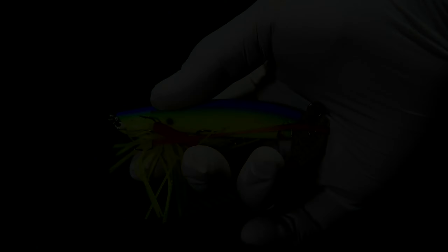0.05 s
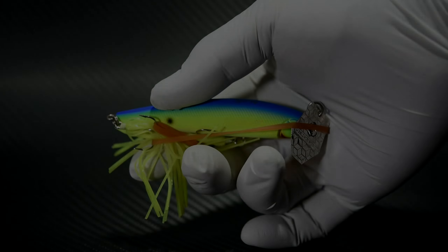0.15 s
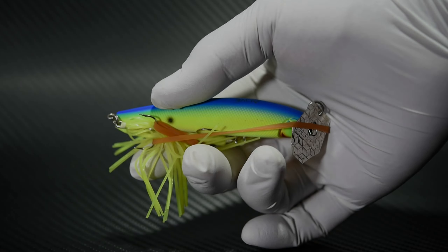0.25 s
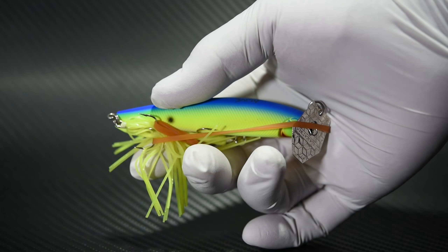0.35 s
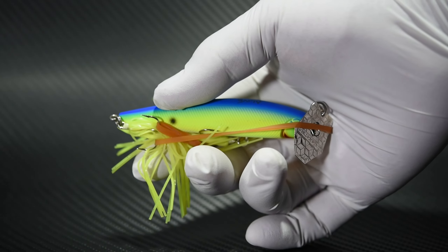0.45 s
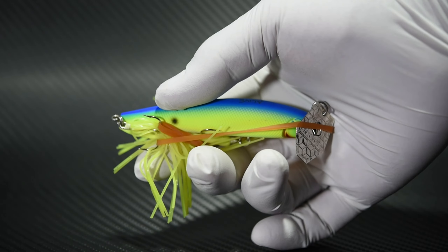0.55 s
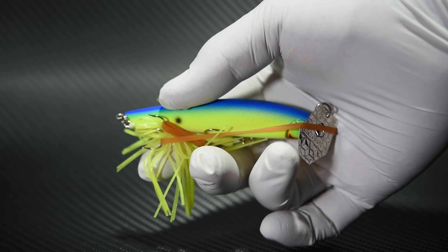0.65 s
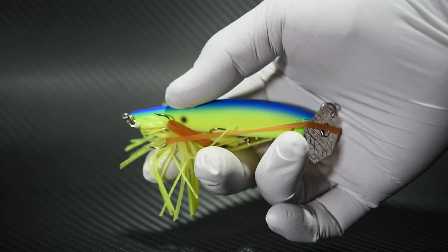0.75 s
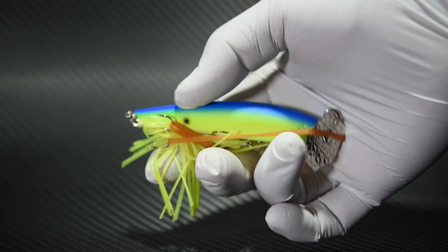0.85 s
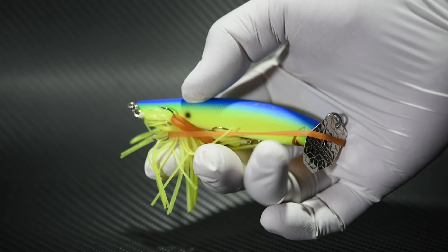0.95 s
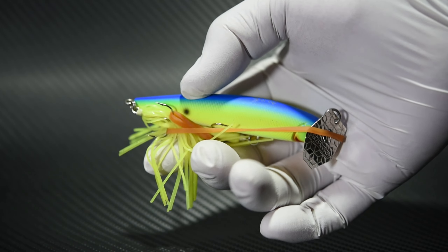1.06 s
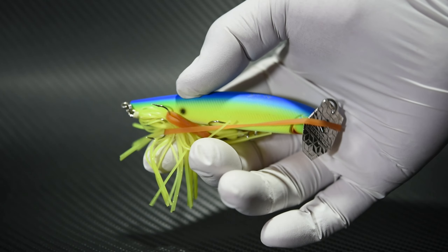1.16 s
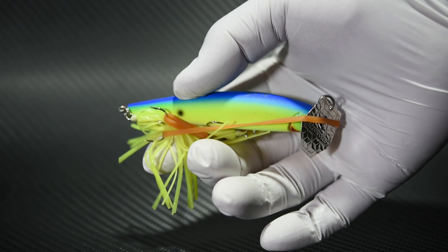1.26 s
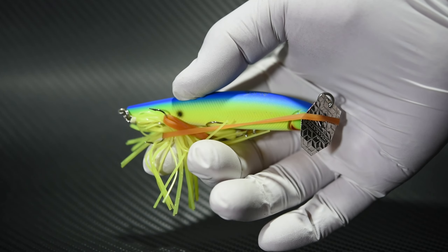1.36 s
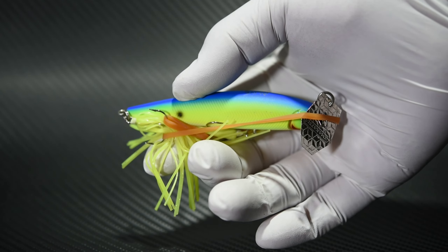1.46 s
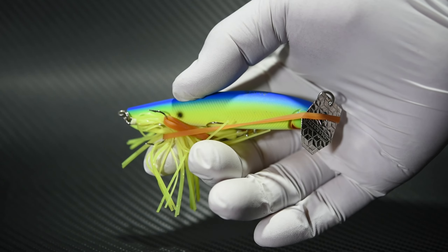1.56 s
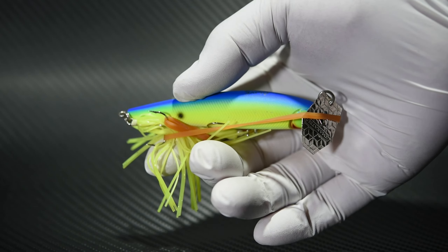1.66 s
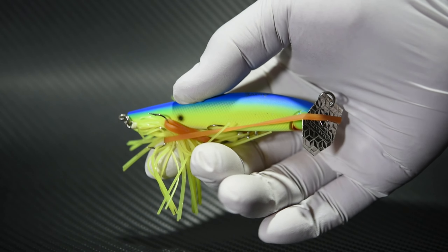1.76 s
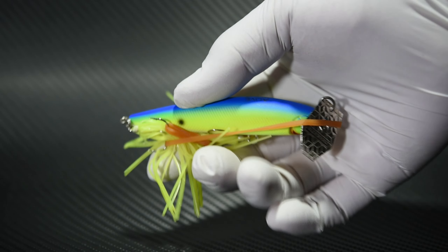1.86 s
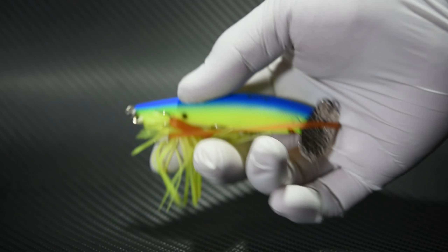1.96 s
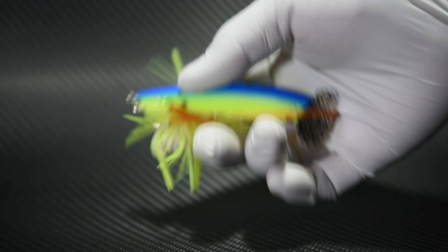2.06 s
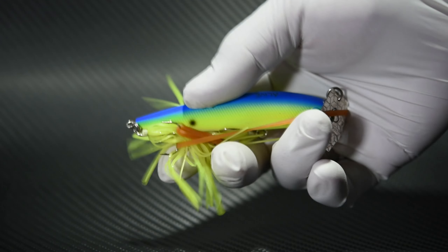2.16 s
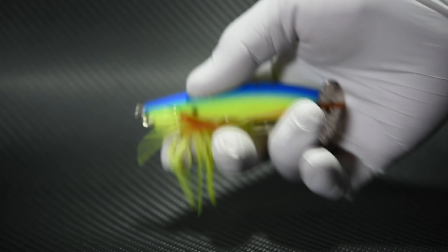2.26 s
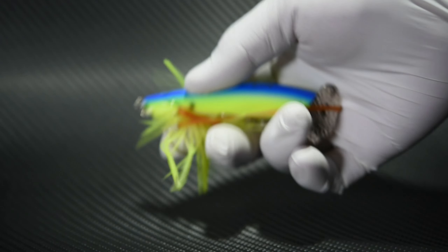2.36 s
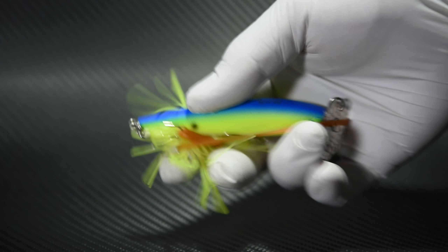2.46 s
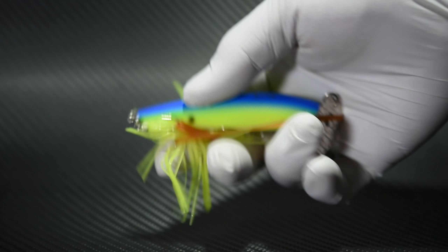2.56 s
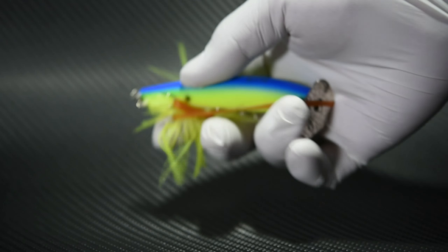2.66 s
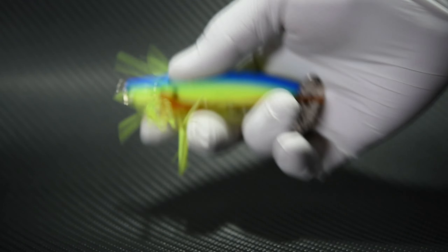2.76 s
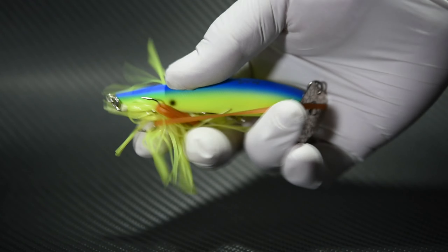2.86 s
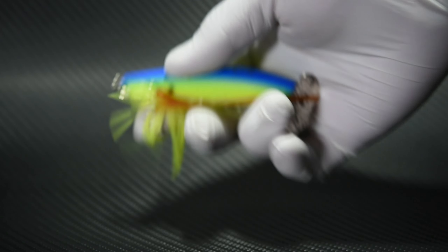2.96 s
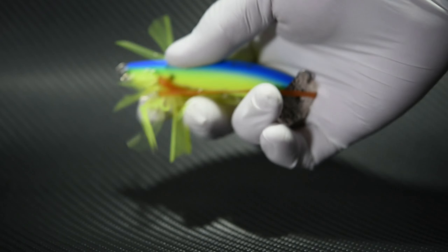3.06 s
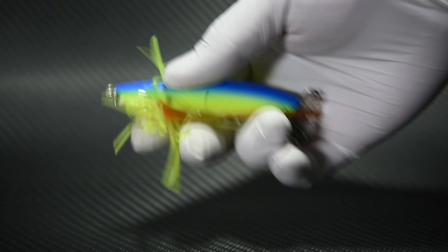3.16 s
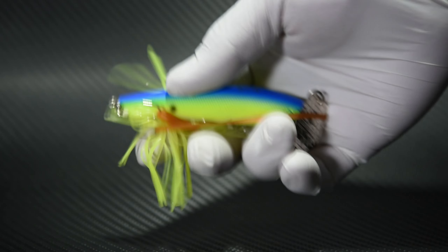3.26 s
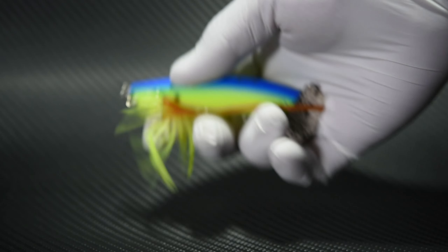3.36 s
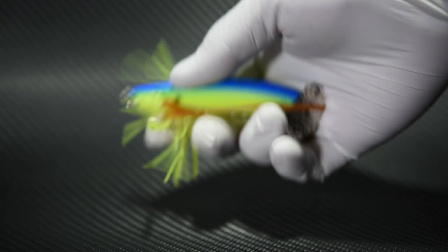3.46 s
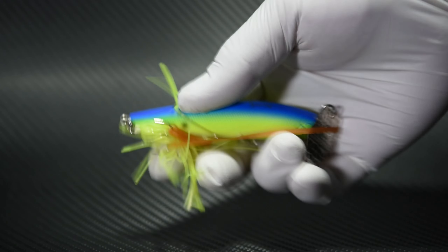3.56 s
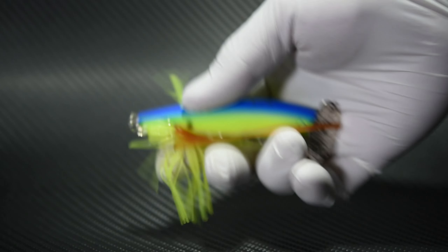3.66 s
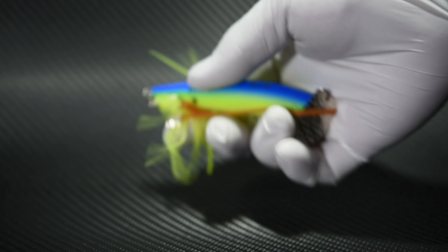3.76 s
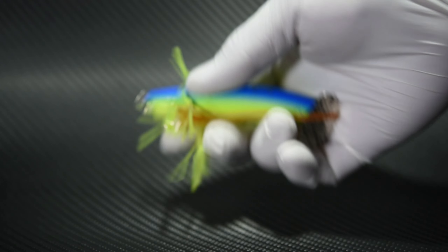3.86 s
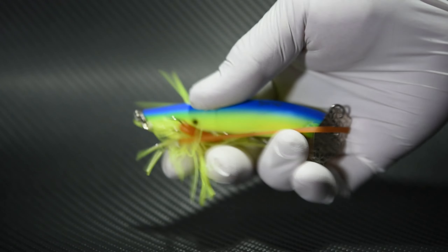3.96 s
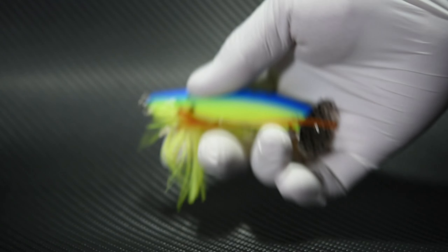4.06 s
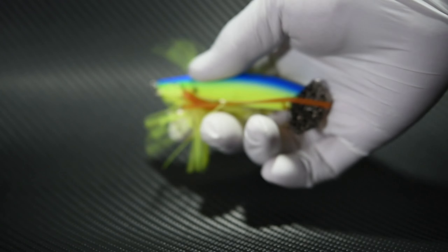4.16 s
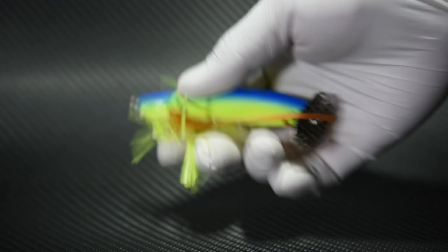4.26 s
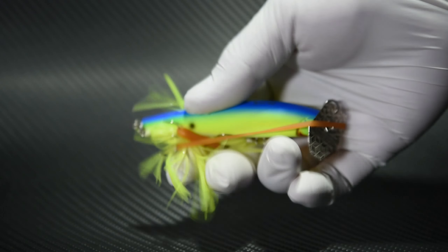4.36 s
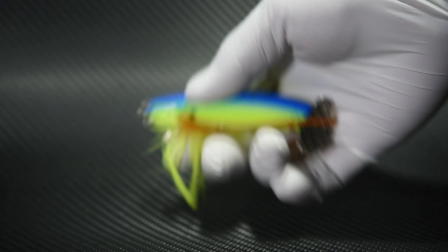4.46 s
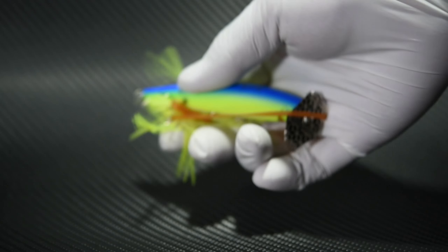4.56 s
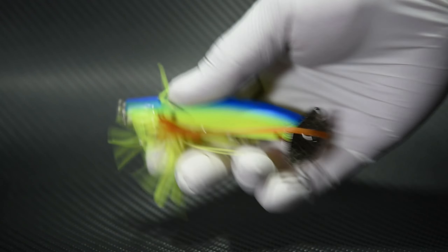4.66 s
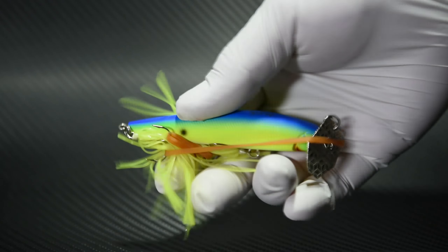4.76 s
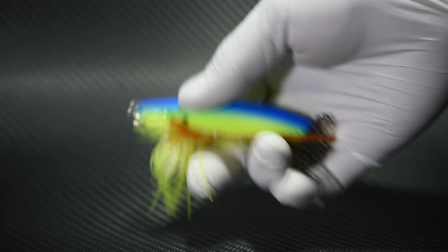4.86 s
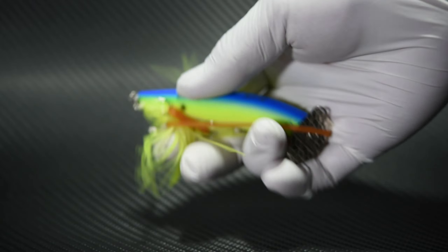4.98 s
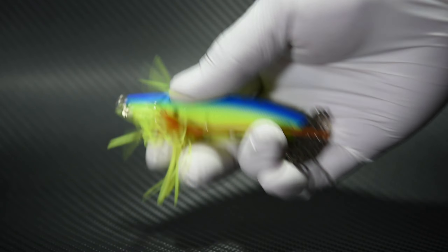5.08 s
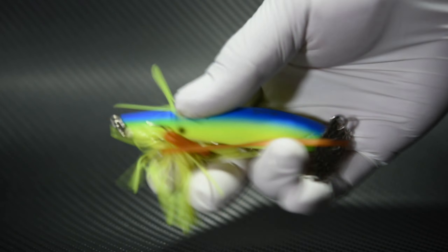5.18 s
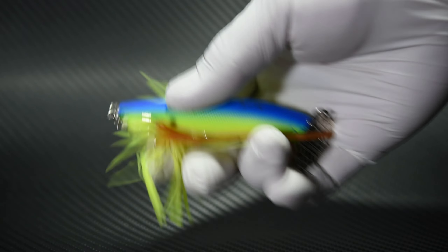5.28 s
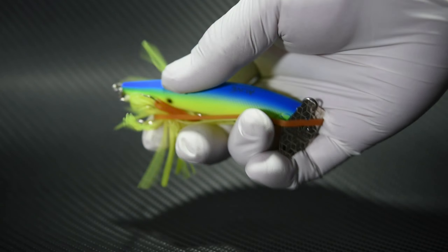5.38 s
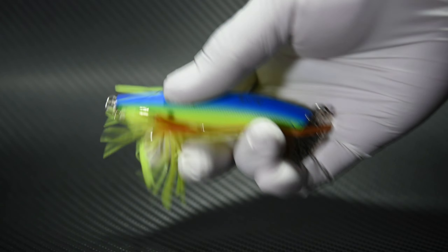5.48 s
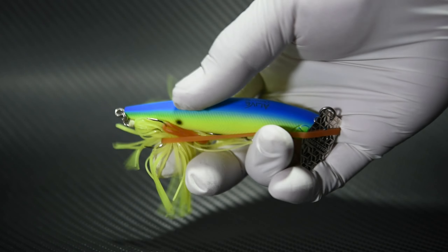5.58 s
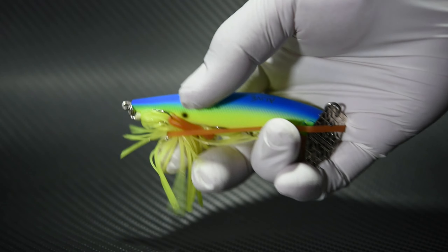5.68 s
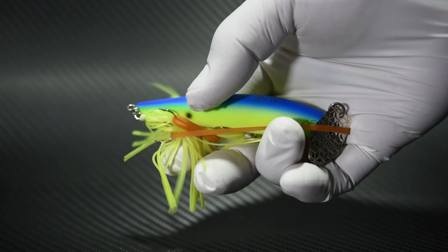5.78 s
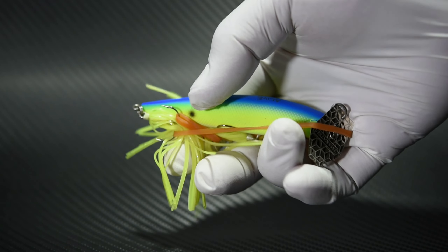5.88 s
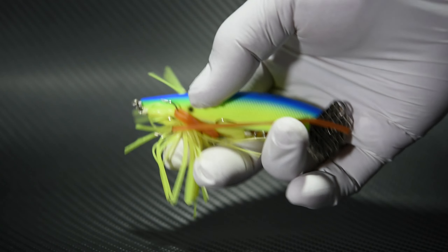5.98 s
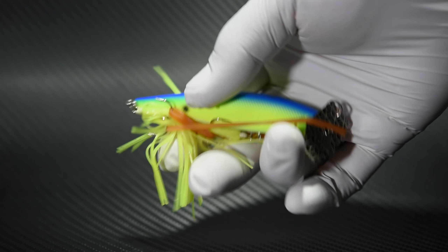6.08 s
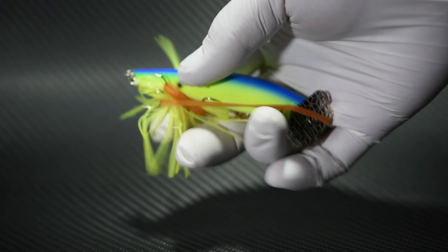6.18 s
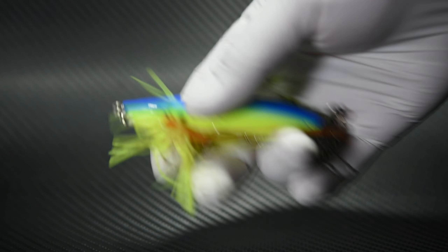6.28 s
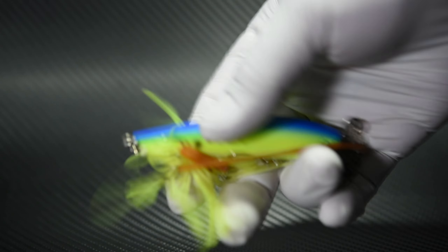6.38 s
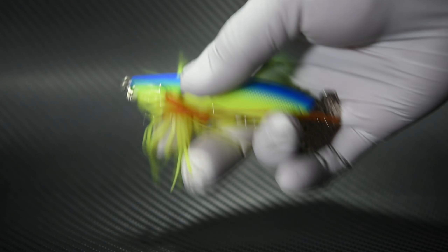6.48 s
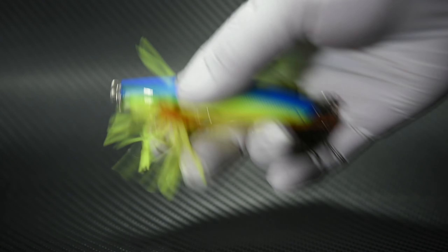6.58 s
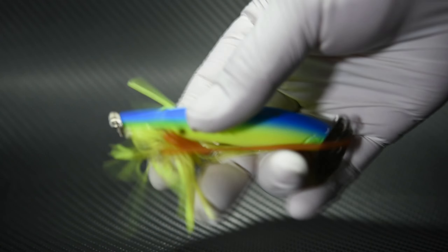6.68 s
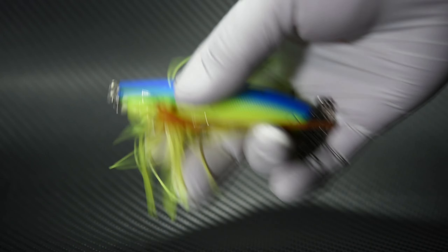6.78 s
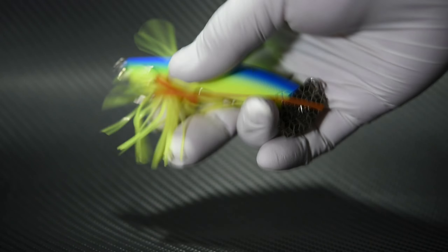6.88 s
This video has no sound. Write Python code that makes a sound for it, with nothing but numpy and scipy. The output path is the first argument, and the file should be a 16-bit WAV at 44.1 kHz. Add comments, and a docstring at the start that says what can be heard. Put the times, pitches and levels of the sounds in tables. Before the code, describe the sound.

Sound fades in quickly from silence to a faint mains hum and airy fan, with light glove rubs. A rapid, even rattle follows: hard balls slamming back and forth inside a thin plastic shell, some fourteen crisp knocks a second, each with a short scatter of bounces. It runs over three seconds, pauses about half a second, and starts again. Close microphone, short small-room echo.

```python
"""Shaken fishing lure

A gloved hand shakes a hollow plastic lure about seven times a second, in two bouts.
At each turn loose balls slam into one end of the shell, bounce and jostle: ringing knocks, echoed by
a small room. Before and between the bouts the glove rubs faintly: crackling noise bands.
A fan runs throughout: sines for mains hum, filtered noise for its tones and air."""
import sys
import numpy as np
from scipy import signal
from scipy.fft import rfft, irfft, next_fast_len
from scipy.io import wavfile

SR = 44100
rng = np.random.default_rng(int(sys.argv[2]) if len(sys.argv) > 2 else 0)


def materialize(psi):
    """Save the field psi as 16-bit PCM at rate SR to the path in sys.argv[1].

    A 1-D psi becomes a single channel; in a 2-D psi each row is a channel.
    """
    bounded = np.clip(np.atleast_2d(psi).T, -1, 1)
    quanta = np.round(bounded * 32767).astype(np.int16)
    wavfile.write(sys.argv[1], SR, quanta)


N = 305613
TIME = np.arange(N) / SR
FFT_SIZE = next_fast_len(N, True)
KNOCK_SAMPLES, LEAD_SAMPLES = 512, 8  # knock length; silence before its attack


def undb(db):
    """Decibels to gain."""
    return 10 ** (np.asarray(db) / 20)


def unit(x):
    """Scale to rms 1."""
    return x / np.sqrt(np.mean(x ** 2))


def along(hz, points_hz, values):
    """Join points by straight lines on a log-frequency axis."""
    return np.interp(np.log(hz + 1), np.log(points_hz), values)


def bell(hz, centre_hz, width_hz):
    """Power response of one resonance, 1 at its centre."""
    return 1 / (1 + (2 * (hz - centre_hz) / width_hz) ** 2)


def noise(gain):
    """White noise through a frequency response."""
    spectrum = rfft(rng.standard_normal(N), FFT_SIZE)
    return irfft(spectrum * gain, FFT_SIZE)[:N]


def add(out, at_s, sound):
    """Mix a stereo sound in at a time."""
    start = max(int(round(at_s * SR)), 0)
    length = max(min(sound.shape[1], N - start), 0)
    out[:, start:start + length] += sound[:, :length]


def uneven(spread_db, count):
    """Random strengths, normally distributed in dB."""
    return undb(spread_db * rng.standard_normal(count))


def curve(table, at_s):
    """Value of each column at a time, on straight lines between rows."""
    times_s, *columns = np.transpose(table)
    return [np.interp(at_s, times_s, column) for column in columns]


def fan(waver=0.032):
    """Mains hum of slightly swaying sines, plus noise shaped into wavering tones and air, left and right."""
    # mains hum: (frequency [Hz], level [dB rms])
    hum_lines = [(120, -53.5), (180, -61), (240, -53), (300, -61), (360, -64.5), (420, -67), (480, -71.5)]
    # wavering tones, level common to both sides: (frequency [Hz], width [Hz], level [dB rms])
    tones = [(225, 33, -60.5), (267.7, 6.7, -58), (768, 32, -68.5), (959, 19, -71.5), (1151, 38, -66.5),
             (1360, 14, -68.5), (1508, 12, -68), (1677, 21, -70)]
    # air and hiss common to both sides: (frequency [Hz], density [dB per Hz], left-right likeness [-])
    air = [(25, -90, 0.64), (100, -85.5, 0.81), (146, -83, 0.87), (218, -74, 0.98), (300, -80, 0.9),
           (383, -80.5, 0.43), (500, -86.5, 0.58), (760, -89, 0.72), (1095, -84.5, 0.46),
           (1490, -86.5, 0.53), (1900, -90, 0), (3200, -89, 0.0004), (9050, -90.5, 0), (10700, -97.5, 0),
           (14200, -108, 0)]
    hum = 0
    for line_hz, db in hum_lines:
        sway_points = rng.standard_normal(size=30)
        sway = 1 + waver * np.interp(TIME, np.linspace(0, TIME[-1], num=30), sway_points)
        sine = np.sin(2 * np.pi * (line_hz * TIME + rng.random()))
        hum = hum + np.sqrt(2) * undb(db) * sway * sine

    hz = np.fft.rfftfreq(FFT_SIZE, 1 / SR)
    points_hz, air_db, likeness = np.transpose(air)
    power_per_hz = undb(along(hz, points_hz, air_db)) ** 2
    for tone_hz, width_hz, db in tones:
        # the squared bell has area width * pi / 4
        power_per_hz = power_per_hz + undb(db) ** 2 * bell(hz, tone_hz, width_hz) ** 2 / (width_hz * np.pi / 4)
    gain = np.sqrt(power_per_hz * SR / 2)
    alike = np.clip(along(hz, points_hz, likeness), -.5, 1)
    common = noise(gain)
    difference = noise(gain * np.sqrt((1 - alike) / (1 + alike)))
    return hum + common + np.array([[1], [-1]]) * difference


def glove(rub_db=4.5, crackle_db=6.0):
    """Rubber slips in tiny uneven steps, each rub in its own band."""
    # rubs and nudges; width before its 1.2 factor, level before rub_db:
    # (middle [s], length [s], frequency [Hz], width [Hz], level [dB])
    rubs = [(0.455, 0.063, 3100, 500, -56), (0.5, .25, 11500, 3000, -64), (.58, 0.11, 3200, 400, -57),
            (0.796, 0.089, 9000, 4000, -56), (.97, .24, 12800, 3000, -66), (1.275, 0.056, 5500, 4000, -54),
            (1.404, .06, 7000, 3000, -57), (1.725, .06, 10400, 1400, -59), (1.87, .45, 880, 550, -56.5),
            (1.909, 0.063, 4680, 696, -52), (2.998, .1, 1600, 300, -55.5), (3.06, 0.057, 253, 60, -49),
            (5.728, 0.024, 3100, 500, -54), (5.958, .15, 9350, 3200, -50), (6.06, 0.012, 4800, 2000, -46),
            (6.136, 0.016, 6960, 3500, -42)]
    out = np.zeros((2, N))
    for middle_s, length_s, centre_hz, width_hz, db in rubs:
        count = int(length_s * SR)
        hz = np.fft.rfftfreq(count, 1 / SR)
        steps = rng.standard_normal((2, count))
        steps = steps * undb(crackle_db * np.minimum(rng.exponential(size=count), 6))
        rub = irfft(rfft(steps) * bell(hz, centre_hz, 1.2 * width_hz), count)
        add(out, middle_s - length_s / 2, unit(rub) * np.hanning(count) * undb(db + rub_db))
    return out


def room(x, early_db=-11.5, early_decay_s=0.0043, tail_db=-10.5, t60_s=0.44, right_db=2.0, count=50):
    """Direct sound, dense early echoes, then a short diffuse tail."""
    # colour of the echo: (frequency [Hz], gain [dB])
    echo_colour = [(2500, 1), (4000, 3), (8000, -4.5), (10500, 0.5), (15000, -5)]
    t = TIME[:SR // 2]
    direct = np.zeros((2, len(t)))
    direct[:, 0] = undb(np.array([-right_db, right_db]) / 2)
    colour = undb(along(np.fft.rfftfreq(len(t), 1 / SR), *np.transpose(echo_colour)))
    early_decay = (t > .0024) * np.exp(-t / early_decay_s)
    tail_decay = (t > .006) * undb(-60 * t / t60_s)
    out = np.zeros((2, N))
    # the lure keeps moving, so each stretch of its sound meets a new pattern of echoes
    for part in np.array_split(np.arange(N), count):
        early, tail = rng.standard_normal((2, 2, len(t)))
        echo = undb(early_db) * unit(early * early_decay) + undb(tail_db) * unit(tail * tail_decay)
        echo = irfft(rfft(echo / np.sqrt(len(t))) * colour, len(t))
        add(out, TIME[part[0]], signal.fftconvolve(x[:, part], direct + echo, axes=1))
    return out


def causal(gain):
    """Minimum-phase impulse response: starts at once, then rings out."""
    cepstrum = irfft(np.log(gain))
    cepstrum[..., 1:KNOCK_SAMPLES // 2] *= 2
    cepstrum[..., KNOCK_SAMPLES // 2 + 1:] = 0
    return irfft(np.exp(rfft(cepstrum)))


def knocks(count, end, cavity_db, bright_db, pitch=1, spot_db=1.5, side_db=3.0, pan_db=1.0, detune=0.025,
           dense_db=-2.5, dense_decay_s=0.00064, lag_spread_s=.00001):
    """Balls strike the nose (end 0) or tail (end 1), exciting the shell's modes: count x 2 x samples."""
    # crack of a hard ball on plastic: (frequency [Hz], nose level [dB], tail level [dB])
    crack_table = [(300, -43, -56), (1190, -27, -39), (1830, -25, -25), (2160, -19, -11),
                   (3470, -12.5, -8.5), (5130, -3.5, -0.5), (7660, 1.5, 2), (9200, -2.5, -4),
                   (10400, -9, -6.5), (12700, -18.5, -12), (15000, -20.5, -17), (16300, -38, -35)]
    # mean ring of the lure, air cavity first, its frequency before the pitch factor:
    # (frequency [Hz], width [Hz], level struck at nose [dB], level struck at tail [dB])
    shell_modes = [(2557, 465, 12, 14), (3430, 190, -2.5, 2), (4720, 370, 1, -2), (5565, 510, 1.5, 8),
                   (7180, 270, 2.5, 3), (8285, 370, 6, 10.5), (9330, 470, 4.5, 9), (11230, 540, 7.5, 9.5),
                   (13650, 760, 5, 4.5)]
    hz, t = np.fft.rfftfreq(KNOCK_SAMPLES, 1 / SR), TIME[:KNOCK_SAMPLES]
    crack, modes = np.transpose(crack_table), np.transpose(shell_modes)
    crack_db = along(hz, crack[0], crack[1 + end])
    crack_db = crack_db + bright_db * along(hz, [4800, 8500], [-.5, .5])
    # the fingers damp the cavity more or less as the grip changes
    crack_db = crack_db + cavity_db * bell(hz, 2740, 1320)

    # each spot weights the modes anew, unevenly for the two sides
    spot = rng.standard_normal((count, 1, len(shell_modes)))
    side = rng.standard_normal((count, 2, len(shell_modes)))
    shift = rng.standard_normal((count, len(shell_modes)))
    mode_db = modes[2 + end] + spot_db * spot + side_db * side
    mode_hz = modes[0] * (1 + detune * shift)
    mode_hz[:, 0] *= pitch
    mode_power = np.maximum(undb(mode_db) ** 2 - 1, 0)
    ring = np.sqrt(1 + mode_power @ bell(hz, mode_hz[..., None], modes[1][:, None]))

    # waves criss-cross the thin wall for a moment, giving every knock its own colour
    wall = rng.standard_normal((count, 1, KNOCK_SAMPLES)) + rng.standard_normal((count, 2, KNOCK_SAMPLES))
    wall = wall * np.exp(-t / dense_decay_s)
    wall = (t == 0) + undb(dense_db) * unit(wall) / np.sqrt(KNOCK_SAMPLES)
    # each spot lies a little nearer to one microphone than to the other
    lag_s = lag_spread_s * rng.standard_normal((count, 1, 1)) * np.array([[.5], [-.5]])
    delay = np.exp(-2j * np.pi * hz * (lag_s + LEAD_SAMPLES / SR))
    sound = irfft(rfft(causal(undb(crack_db) * ring)) * rfft(wall) * delay)
    sound = sound / np.std(sound, axis=(1, 2), keepdims=True)
    return sound * uneven(pan_db, (count, 2, 1))


def volley(times_s, weights, db, *colour):
    """Several knocks that share one level between them, as (time [s], sound) pairs."""
    shares = undb(db) * weights / np.linalg.norm(weights)
    return list(zip(times_s, shares[:, None, None] * knocks(len(times_s), *colour)))


def stroke(at_s, db, end, soft_db=-4.0, cavity_spread_db=1.26, bright_spread_db=1.4, pitch_spread=0.027,
           run_up_s=0.012, run_up_db=-14.5, graze_s=.0062, graze_db=-8.5, pile_s=.0011,
           clatter_db=-4, clatter_loss=0.97, settle_s=0.0082, roam_s=.045, roam_db=-22.5,
           share_spread_db=1.0):
    """Balls skip along the wall, pile into one end, bounce to rest and roam: (time [s], sound) pairs."""
    # the hold of the hand shifts slowly; cavity ring before its factor for each end:
    # (time [s], cavity ring [dB], brightness [dB])
    grip = [(2.0, 1.5, -3), (2.2, -4.5, -1.5), (2.6, 0, -0.5), (2.9, -10.5, -6.5), (3.17, -9, -8.5),
            (3.42, -2, 0.5), (3.85, 3.5, 1.5), (4.2, 1, -1.5), (4.65, 2.5, 2), (5.3, 1.5, -2.5),
            (5.6, -1.5, -0.5), (6.2, -9, -2.5), (6.9, -11.5, -4.5)]
    # how far the balls straggle rather than arrive together: (time [s], straggle [dB])
    straggle = [(2.0, -1.5), (4.1, -1), (4.3, -0.5), (4.85, -3), (5.0, 0), (5.6, 2.5), (6.2, -3.5),
                (6.9, -2.5)]
    # factor on the cavity's frequency: (nose [-], tail [-])
    cavity_pitch = (1.032, 1.022)
    cavity_db, bright_db = curve(grip, at_s)
    straggle_db, = curve(straggle, at_s)
    cavity_db = cavity_db * (1.21, 0.9)[end] + cavity_spread_db * rng.standard_normal()
    bright_db = bright_db + bright_spread_db * rng.standard_normal()
    pitch = cavity_pitch[end] + pitch_spread * rng.standard_normal()
    # slow contacts sound duller
    hard = (end, cavity_db, bright_db, pitch)
    soft = (end, cavity_db, bright_db + soft_db, pitch)

    # grazes, blow and clatter share the stroke's energy; straggling balls graze more and clatter less
    shares = undb([graze_db + straggle_db, 0, clatter_db - clatter_loss * straggle_db])
    shares = shares * uneven(share_spread_db, count=3)
    graze_db, blow_db, clatter_db = db + 20 * np.log10(shares / np.linalg.norm(shares))

    # the balls leave their rest with a few skips, then graze the wall ever more densely
    skip = run_up_s * rng.uniform(1 / 3, 1, size=3)
    hits = volley(at_s - skip, uneven(3.8, count=3) / skip, db + run_up_db + straggle_db, *hard)
    graze = graze_s * rng.random(size=7) ** 1.3
    hits += volley(at_s - graze, uneven(0.73, count=7), graze_db, *soft)
    # at the nose one ball leads cleanly; at the tail several land almost together
    pile = np.append(0, rng.uniform(.0003, pile_s, size=2))
    hits += volley(at_s + pile, np.where(pile > 0, (0.17, 0.54)[end], 1), blow_db, *hard)
    # the first rebound comes promptly, the later ones at random and mostly weaker
    bounce = .0016 + (.0065, .008)[end] * np.append(0, rng.random(size=7)) ** 1.2
    hits += volley(at_s + bounce, uneven(4.1, count=8) * np.exp(-bounce / settle_s), clatter_db, *soft)
    roam = rng.uniform(0.014, roam_s, size=3)
    return hits + volley(at_s + roam, uneven(4.2, count=3), db + roam_db, *hard)


def rattle(nose_db=0.43, tail_db=0.32, stray_db=-9.0):
    """The hand throws the balls from end to end; now and then one knocks alone in between."""
    # the balls reach nose and tail in turn; level before nose_db or tail_db: (time [s], level [dB])
    strokes = [(1.9947, -38.0), (2.0458, -33), (2.1281, -27.0), (2.1957, -27.5), (2.2754, -25),
               (2.34, -26.5), (2.4178, -27.5), (2.4817, -27.5), (2.556, -25.5), (2.6184, -26),
               (2.689, -25.5), (2.7528, -26.5), (2.8251, -26.5), (2.8919, -28), (2.9665, -27.0),
               (3.0336, -26.5), (3.1077, -27.5), (3.1716, -26.0), (3.2435, -27), (3.3091, -27),
               (3.381, -24), (3.4461, -26), (3.5185, -26.5), (3.5818, -26), (3.6542, -25.5),
               (3.7207, -27.5), (3.7942, -27.5), (3.8539, -27.0), (3.929, -25), (3.991, -28.0),
               (4.0678, -25.5), (4.133, -28), (4.2021, -25.0), (4.2678, -27.5), (4.341, -24), (4.4071, -27),
               (4.4737, -26), (4.5393, -23), (4.6068, -23), (4.6707, -24.5), (4.7398, -22), (4.8027, -25),
               (4.8753, -21.0), (4.9375, -27.5), (5.0095, -22), (5.0726, -26.5), (5.1454, -25),
               (5.2074, -26.5), (5.281, -26.5), (5.3412, -27.5), (5.4233, -29.5), (5.4804, -27.5),
               (5.564, -31), (5.6103, -27.0), (6.219, -24), (6.2846, -26.0), (6.357, -20), (6.4223, -24.5),
               (6.4992, -21.0), (6.5703, -24), (6.6426, -22.5), (6.709, -26.5), (6.7865, -24.0),
               (6.8494, -25.5), (6.926, -22.5)]
    # a ball left behind knocks by itself; level before stray_db: (time [s], level [dB])
    strays = [(3.6164, -30), (4.2311, -30), (4.5733, -35), (4.8324, -25.5), (5.2003, -28), (5.2415, -36),
              (5.3581, -24), (5.5971, -31), (6.142, -38), (6.3944, -40)]
    out = np.zeros((2, N))
    for k, (stroke_s, db) in enumerate(strokes):
        end = k % 2
        for hit_s, sound in stroke(stroke_s, db + (nose_db, tail_db)[end], end):
            add(out, hit_s, sound)
    for stray_s, db in strays:
        knock = knocks(count=1, end=0, cavity_db=1.5, bright_db=4.0)[0]
        add(out, stray_s, undb(db + stray_db) * knock)
    return out


def scene(fan_left_db=0.75):
    """Lure and glove in the room, the fan without added echo and a little to the left."""
    fan_sides = undb(np.array([[fan_left_db], [-fan_left_db]]) / 2)
    return room(rattle() + glove()) + fan() * fan_sides


def record(dry, open_s=0.36, fade_db_per_s=195.0, peak=.75, top_hz=16200):
    """The sound fades in; the recorder rounds the sharpest peaks and cuts the top."""
    fade = undb(fade_db_per_s * np.minimum(TIME - open_s, 0))
    rounded = peak * np.tanh(dry * fade / peak)
    low_pass = signal.ellip(8, .2, 70, top_hz, fs=SR, output="sos")
    return signal.sosfilt(low_pass, rounded)


dry = scene()
out = record(dry)
materialize(out)
```